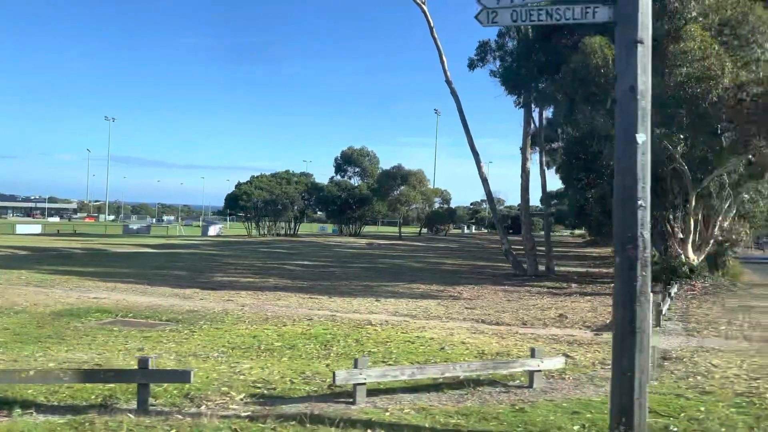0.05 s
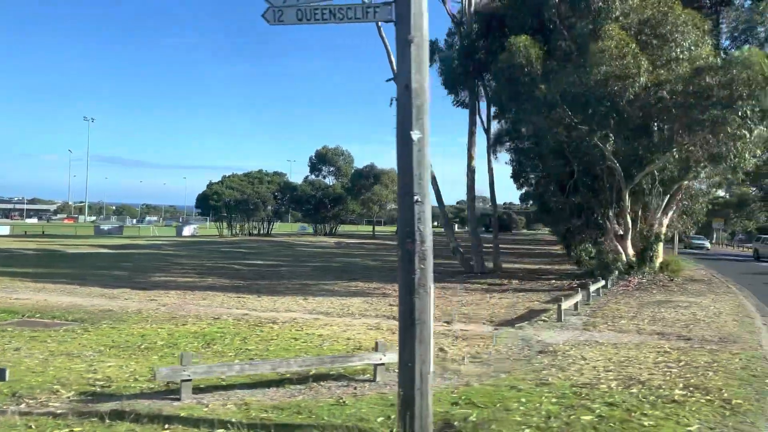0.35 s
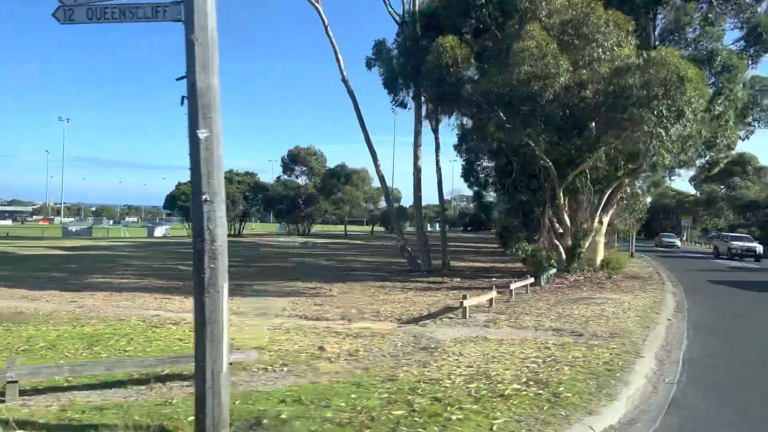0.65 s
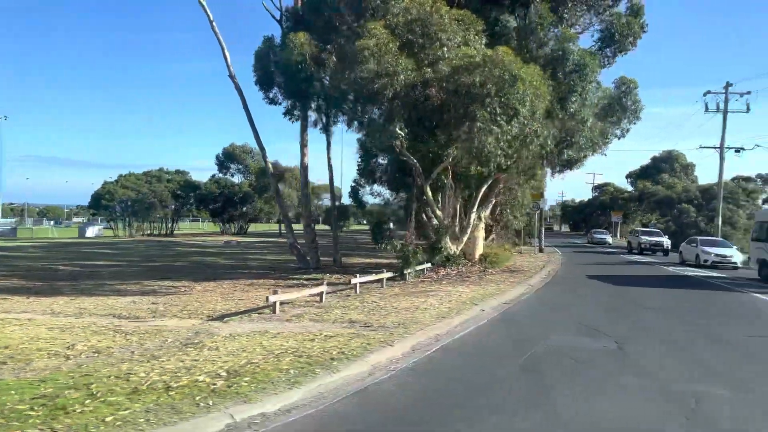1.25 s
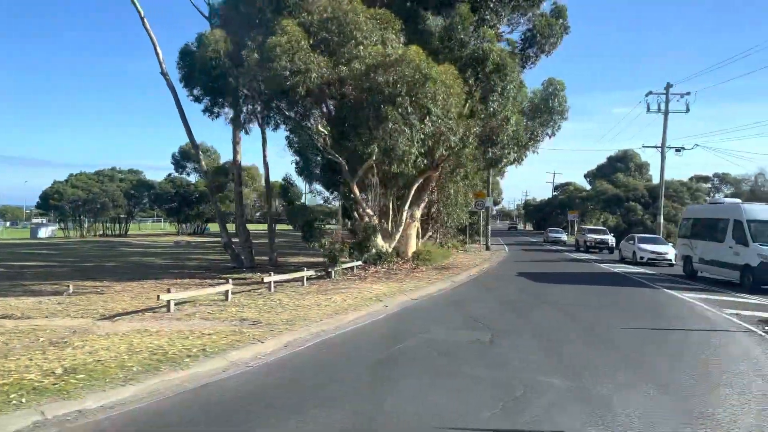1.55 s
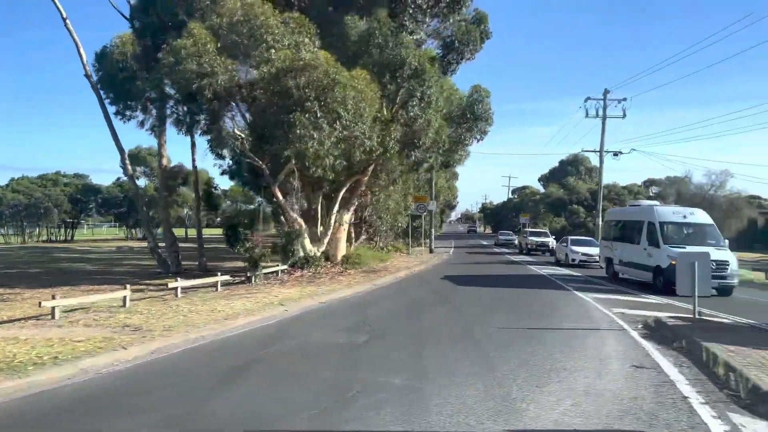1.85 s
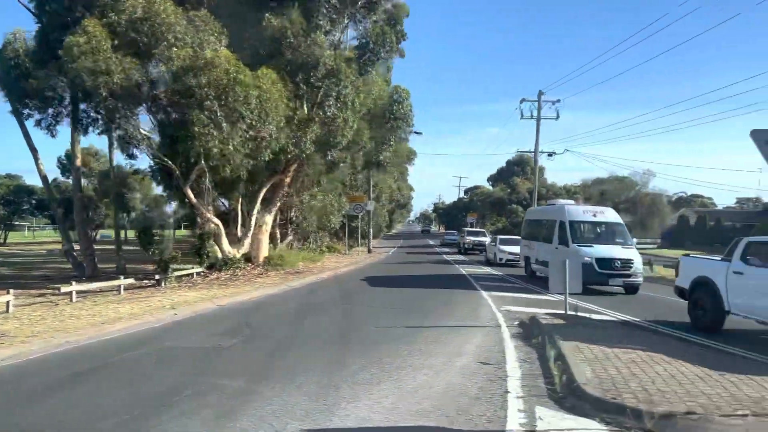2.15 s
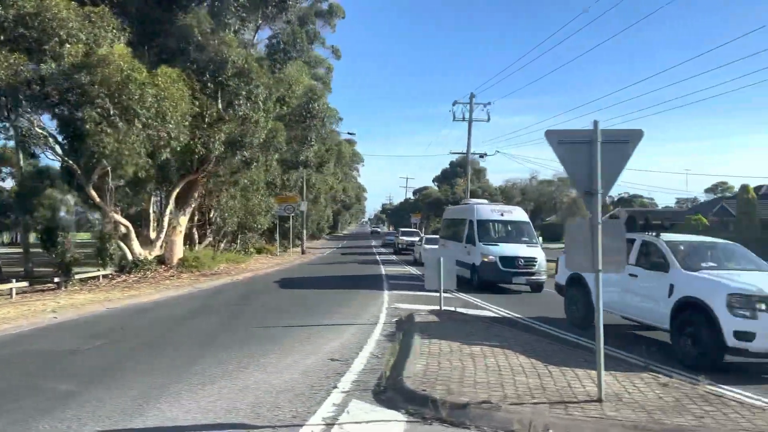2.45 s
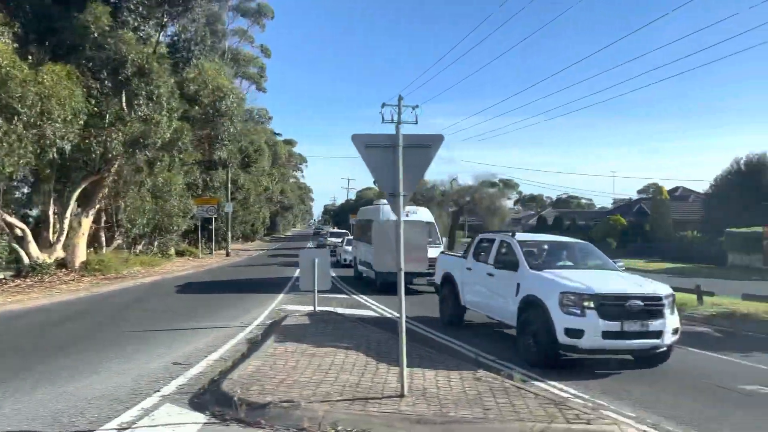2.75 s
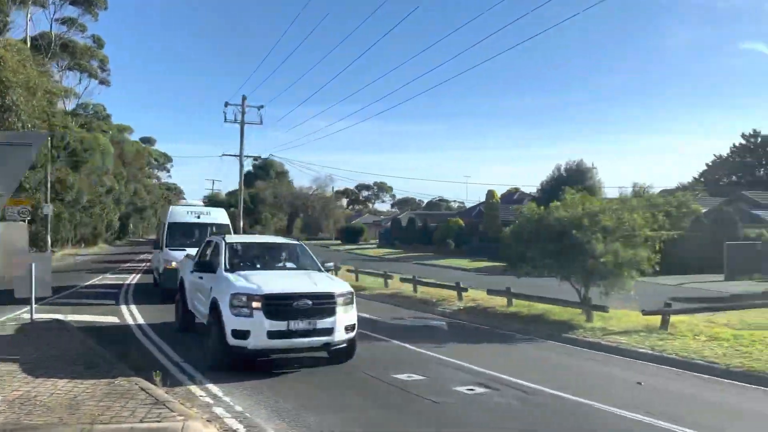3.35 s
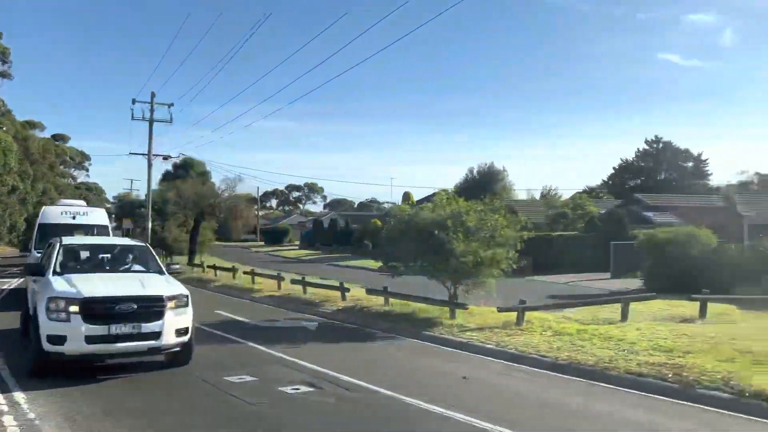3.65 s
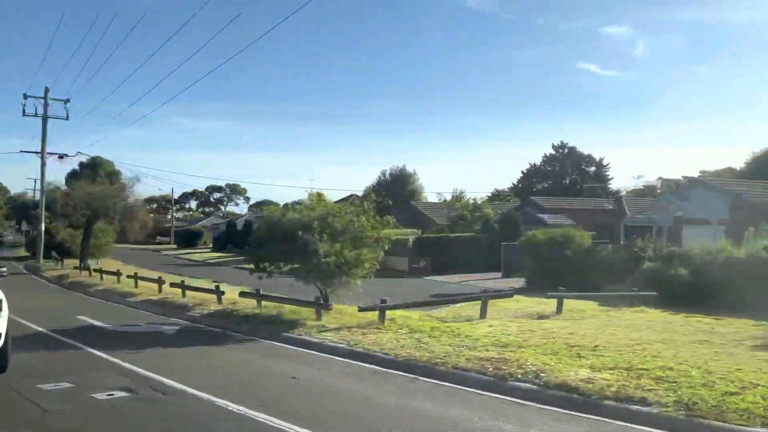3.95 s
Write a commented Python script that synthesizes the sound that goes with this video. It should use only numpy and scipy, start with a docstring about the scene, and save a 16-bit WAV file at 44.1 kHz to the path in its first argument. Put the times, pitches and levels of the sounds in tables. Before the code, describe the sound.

A bus rumbles along, heard from a seat inside, with engine hum, soft air hiss and a faint high whine. Loose panels and fittings rattle as the cabin booms, then the ride settles to soft taps.

```python
"""Inside a bus rolling slowly through a bend. From the start, deep road rumble and tyre roar lie under
the hum of the engine, with hissing air, a faint high whine and buzzing trim. In the first two seconds
the body rocks on the uneven road: the cabin booms twice, loose fittings tick, panels chatter and the
bodywork gives one dull knock. A last jingle and squeal follow. Out of the bend, the hollow ring of the
side panels fades, a seat frame taps softly and a thin whistle swells twice."""
import sys
import numpy as np
from scipy import signal
from scipy.fft import rfft, irfft
from scipy.io import wavfile
from scipy.ndimage import uniform_filter1d

SR = 44100
rng = np.random.default_rng(int(sys.argv[2]) if len(sys.argv) > 2 else 0)


def to_wav(s):
    """Save 16-bit WAV."""
    ch = np.atleast_2d(s).T  # columns
    pcm = np.round(np.clip(ch, -1, 1) * 32767)  # PCM
    wavfile.write(sys.argv[1], SR, pcm.astype(np.int16))


N = 176400
T = np.arange(N) / SR
HZ = np.fft.rfftfreq(N, 1 / SR)

# Road bed faders: time_s, rumble_db, drone_db, roar_db
ROAD_FADERS = [(0.0, -13.5, -14.5, -46), (0.02, -18, -25, -37.5), (0.34, -17, -20.5, -34.5),
               (0.87, -17, -24.5, -36), (1.09, -30, -23.5, -37.5), (1.15, -17.5, -27.5, -38.5),
               (1.61, -16, -22, -35), (1.7, -38, -30, -33), (1.76, -9, -19, -38.5), (1.82, -11, -23, -35),
               (2.04, -21, -25.5, -37.5), (3.38, -17.5, -28.5, -38), (3.45, -26.5, -29.5, -37),
               (4.0, -16.5, -23, -37)]
# Tone of the suspension rumble, body drone and tyre roar: frequency_hz, gain_db
RUMBLE_EQ = [(15, -36), (21, -47), (26, -18), (33, -5.5), (42, 4), (51, 0), (60, 4.5), (72, 4.5), (84, -1),
             (100, -7.5), (140, -22.5), (300, -84)]
DRONE_EQ = [(50, -9), (95, 0), (112, 1.5), (128, -2), (148, 2.5), (170, -2), (205, -5), (245, -6.5),
            (265, -8), (290, -17.5), (340, -22), (600, -67)]
ROAR_EQ = [(150, -2.5), (305, 1), (370, 5), (430, 0.5), (560, -3), (720, -2), (1000, -5), (1200, -10.5),
           (1400, -18), (1550, -14.5), (1800, -24), (2300, -23), (2900, -29.5), (5000, -46)]
# Engine under the floor: time_s, crank_speed_hz, fader_db
ENGINE_RUN = [(0, 28.44, -33), (.3, 29.06, -30.5), (.55, 29.99, -30.5), (.8, 29.84, -28.5),
              (.97, 28.92, -30.5), (1.17, 29.06, -34), (1.38, 29.01, -26.5), (1.55, 29.95, -29.5),
              (1.76, 30.37, -29.5), (1.93, 29.14, -32.5), (2.06, 29.36, -28), (2.18, 28.38, -30),
              (2.38, 29.93, -29), (2.68, 29.44, -30.5), (2.92, 28, -30.5), (3.14, 28.54, -32.5),
              (3.45, 28.3, -30.5), (4, 28.39, -32)]
# Engine and belt-driven tones: crank_multiple, early_db, late_db, pan_left_db, left_lead_rad
ENGINE_ORDERS = [(.885, -28, -6, -1, 0.039), (1.78, -16, 1.5, 2, 0.028), (2.49, -1, 1.5, -0.3, 0.02),
                 (2.87, 1.5, -2.5, 2.5, 0.04), (3.85, -2, -3.5, 6, 0.029), (5.08, -11, -4.5, -2, 0.048),
                 (5.93, -6.5, -1.5, -1.5, 0.17), (8, 0.45, 0, 5.5, 0.12), (8.8, -11, -2.5, -1, 0.25),
                 (12, -20, -10, 14, 0.7)]
# Swells of the cabin boom, hollow side panels and air whistle: time_s, fader_db
BOOM_FADER = [(0, -38), (.22, -32), (.36, -20), (.8, -18.2), (1.03, -28), (1.2, -21), (1.58, -18.2),
              (1.9, -27), (2.2, -38), (4, -42)]
HOLLOW_FADER = [(0, -35.5), (.45, -36.5), (1.0, -42), (1.4, -37.5), (2.1, -48.5), (4, -59)]
WHISTLE_FADER = [(0, -63), (2, -67), (2.45, -58), (2.7, -61.5), (3.05, -63), (3.35, -64), (3.55, -56.5),
                 (3.8, -63), (4, -70)]
# Tone of the side panels, chattering panels, ticks and air hiss: frequency_hz, gain_db
HOLLOW_EQ = [(280, -27), (350, -7.5), (385, -0.5), (425, -17.5), (465, -12), (560, -10), (800, -22),
             (1300, -56)]
PANEL_EQ = [(300, -46), (900, 6), (2100, -6.5), (3000, -2), (5000, -4.5), (6800, -5), (9000, -15),
            (15000, -24)]
TICK_EQ = [(600, -36), (2000, 0.5), (4500, -0.5), (6500, 0.5), (8200, -1), (10000, -11.5), (12500, -5),
           (15500, -17)]
HISS_EQ = [(800, 0.5), (2500, -3), (4200, 2), (5600, -1.5), (7500, -1.5), (8600, -9), (9600, 0),
           (10500, -12), (11800, 3), (13000, -7), (15500, -12)]

# Rattle cues: start_s, level_db, rise_s, fall_s, tilt_db_per_octave
PANEL_CHATTER = [(.198, -41.5, 0.015, 0.031, -5.5), (.407, -30, 0.0069, 0.046, -5.5),
                 (.44, -41.5, 0.072, 0.13, -2.5), (.612, -37.5, 0.0082, 0.042, -6),
                 (.85, -40, 0.0063, 0.031, -5.5), (1.215, -46, 0.0082, 0.087, -1),
                 (1.328, -36, 0.0028, 0.027, -12), (1.37, -40.5, .012, 0.021, 0.5),
                 (1.885, -43.5, 0.014, 0.12, -0.5), (2.326, -42, 0.016, 0.033, 3)]
METAL_JINGLES = [(1.375, -44.5, 0.0086, 0.02, 20), (1.890, -39, 0.0058, 0.047, -2.5),
                 (1.938, -33, 0.0051, 0.019, 2), (1.965, -32.5, 0.007, 0.031, -8),
                 (2.328, -37, 0.016, 0.037, -3)]
CLIP_SQUEALS = [(2.335, -41, 0.0082, 0.018, -1.5)]
COVER_CLACKS = [(.409, -40, .003, .018, 0), (.424, -40, .004, .03, -3)]
JOINT_CREAKS = [(.198, -47, .014, .03, 0)]
# Cues with one envelope shape per part: start_s, fader_db
FITTING_TICKS = [(0.3092, -38.5), (0.3633, -30), (0.411, -34.5), (0.4997, -33.5), (0.5181, -39),
                 (0.615, -38), (0.9793, -31.5), (1.3273, -29.5), (1.693, -34), (2.0627, -36.5),
                 (2.3267, -36)]
SEAL_SQUEAKS = [(1.06, -59), (3.235, -54.5), (3.8, -57)]
SEAT_TAPS = [(2.458, -43), (2.658, -40), (2.938, -39.5), (3.058, -38), (3.696, -40.5), (3.858, -40)]
# Resonances of the loose parts: pitch_hz, width_hz, gain_db
PANEL_RESONANCES = [(1470, 66, 12), (1920, 410, 8.5), (4770, 200, 3.5), (6400, 250, -3)]
METAL_RESONANCES = [(990, 160, 1), (1220, 130, 6), (2115, 130, 1.5), (2585, 90, -.5), (3750, 200, -5),
                    (5560, 300, -8.5)]
CLIP_RESONANCES = [(4840, 110, -5), (5750, 200, -5), (6460, 130, 0)]
COVER_RESONANCES = [(1570, 160, 1), (1820, 210, -4), (2220, 150, -3)]
JOINT_RESONANCES = [(2580, 160, 0), (3250, 260, -8)]
SEAL_RESONANCES = [(3780, 64, 1), (4150, 130, -7)]
SEAT_RESONANCES = [(950, 220, 5), (1220, 130, 2), (2031.7, 500, -18)]
TRIM_RESONANCES = [(747, 43, -49), (962, 164, -48), (1114, 47, -51.5), (1268, 180, -54.5), (1590, 450, -56),
                   (2170, 620, -66)]
# Low modes of the knocked bodywork: pitch_hz, level_db, t60_s
BODY_MODES = [(361, -22, .12), (495, -19.5, .10), (560, -22.5, .05)]
# Narrow bands of air whine: pitch_hz, width_hz, level_db, pan_left_db, growth_db_per_s
WHINE_BANDS = [(3810, 280, -74.5, -4, 1.5), (5245, 130, -63.5, 0, -1), (6170, 110, -74.5, -5, 1),
               (7350, 200, -74.5, 3, 1), (8015, 75, -67.5, 5, -0.6)]

# How alike the left and right microphones sound: frequency_hz, likeness_0_to_1
STEREO_LIKENESS = [(40, .998), (130, .97), (260, .93), (340, .3), (560, .3), (660, .5), (880, .1),
                   (1120, .5), (1250, .3), (1450, .88), (2100, .55), (3000, .2), (7700, .15), (8600, .88),
                   (16000, .88)]
# Phase between the microphones: frequency_hz, left_lead_rad
STEREO_LEAD = [(60, 0), (130, .05), (500, .3), (650, -.8), (1000, -.6), (1130, -3.6), (1750, -4.4),
               (2200, -6.3), (3000, -9), (8800, -6.3), (9300, -6), (9900, -3.2), (10900, -3), (11500, 0),
               (12700, 0), (13500, 3.1), (14400, 3.2), (15200, 6.2)]
# Balance between the microphones: frequency_hz, pan_left_db
STEREO_BALANCE = [(60, -0.5), (150, 1), (240, 2), (320, -2), (430, -3), (700, 1.8), (2000, 2.5), (4000, 0),
                  (6000, -5), (7500, 3.5), (9000, -0.5)]


def road():
    """Rumble through the suspension, drone of the body, and tyre roar fluttering with the surface."""
    rumble = compress(noise(RUMBLE_EQ), window_s=0.064, amount=0.24) * amp(curve(ROAD_FADERS) - 4)
    drone = compress(noise(DRONE_EQ), window_s=0.065, amount=0.99)
    drone *= amp(curve(ROAD_FADERS, column=2) - 0.5)
    roar = noise(ROAR_EQ) * amp(curve(ROAD_FADERS, column=3) + 2.5 + 1.33 * wander(rate_hz=21.5))
    return rumble + drone + roar


def engine():
    """Engine and belt-driven parts hum in wavering tones at multiples of the crankshaft speed."""
    waver_rad, waver_db = 0.29, 0.32
    crank_angle = 2 * np.pi * np.cumsum(curve(ENGINE_RUN)) / SR
    crossfade = np.interp(T, (1.17, 3.2), [0, 1])  # from the early balance of tones to the late one
    hum = np.zeros((2, N))
    for multiple, early_db, late_db, pan_db, lead_rad in ENGINE_ORDERS:
        phase = multiple * crank_angle + waver_rad * wander(rate_hz=7.1) + rng.uniform(0, 2 * np.pi)
        level = amp(early_db + (late_db - early_db) * crossfade + waver_db * wander(rate_hz=4.7))
        hum += pan(pan_db) * level * np.sin(phase - np.array([[0], [lead_rad]]))
    return np.sqrt(2) * hum * amp(curve(ENGINE_RUN, column=2) - 0.5)


def cabin_boom():
    """The lowest air resonance of the cabin swells while the body rocks."""
    pitch_hz, drift_rad = 57.1, 0.29
    phase = 2 * np.pi * pitch_hz * T + drift_rad * wander(rate_hz=1.9)
    return np.sqrt(2) * np.sin(phase) * amp(curve(BOOM_FADER) + 0.5 + 0.61 * wander(rate_hz=21))


def body_knock():
    """One soft blow rings a few low modes of the bodywork."""
    start_s, rise_s = 1.443, 0.004
    age = np.maximum(T - start_s, 0)
    ring = sum(amp(db - 60 * age / t60) * np.sin(2 * np.pi * hz * age) for hz, db, t60 in BODY_MODES)
    return np.minimum(age / rise_s, 1) * ring


def panel_chatter():
    """Loose panels shake with a broad, dry sound."""
    boost_db = sum(db / rolloff(hz, width) for hz, width, db in PANEL_RESONANCES)
    return bursts(PANEL_CHATTER, spectrum(PANEL_EQ) + boost_db)


def fitting_ticks():
    """A loose fitting makes sharp contacts, each with a short spray of cabin reflections."""
    rise_s, fall_s, tail_s, tail_db = 0.001, 0.0022, 0.024, -12
    envelope = np.zeros(N)
    for start, db in FITTING_TICKS:
        age = np.maximum(T - start, 0)
        decay = np.exp(-age / fall_s) + amp(tail_db) * np.exp(-age / tail_s)
        envelope += amp(db - 3.5) * np.minimum(age / rise_s, 1) * decay
    return mic_stereo(envelope * rng.standard_normal((2, N)), spectrum(TICK_EQ))


def small_parts():
    """As the body twists, metal, a slipping clip, a plastic cover, a joint, a seal and a seat ring."""
    squeak_shape, tap_shape = (0.025, 0.057, 0), (0.003, 0.015, 0)  # rise_s, fall_s, no tilt
    squeaks = [(start, db, *squeak_shape) for start, db in SEAL_SQUEAKS]
    taps = [(start, db, *tap_shape) for start, db in SEAT_TAPS]
    return (rattle(METAL_JINGLES, METAL_RESONANCES) + rattle(CLIP_SQUEALS, CLIP_RESONANCES)
            + rattle(COVER_CLACKS, COVER_RESONANCES) + rattle(JOINT_CREAKS, JOINT_RESONANCES)
            + rattle(squeaks, SEAL_RESONANCES) + rattle(taps, SEAT_RESONANCES))


def hollow_panels():
    """Road noise rings the side panels in the low mids, fading out of the bend."""
    return noise(HOLLOW_EQ) * amp(curve(HOLLOW_FADER))


def trim_buzz():
    """Pieces of trim buzz in brief, uneven spurts, partly shaken together; their travel is limited."""
    shared_db = 6 * wander(rate_hz=20)
    buzz = np.zeros((2, N))
    for hz, width, db in TRIM_RESONANCES:
        spurt_db = np.minimum(shared_db + 9.5 * wander(rate_hz=20), 7)
        buzz += unit(noise_band(hz, width) * amp(spurt_db)) * amp(db)
    return buzz


def air():
    """Air hisses softly, with a fuzzy whine and one thin whistle that swells out of the bend."""
    hiss = noise(HISS_EQ) * amp(-55 + 0.5 * wander(rate_hz=11))
    whine = sum(noise_band(hz, width) * pan(pan_db) * amp(db + growth * T)
                for hz, width, db, pan_db, growth in WHINE_BANDS)
    whistle = compress(noise_band(hz=5130, width_hz=110), window_s=0.031, amount=0.65)
    return hiss + whine + whistle * pan(-1.5) * amp(curve(WHISTLE_FADER))


def rattle(cues, resonances):
    """Bursts of contacts ring a small part in a few narrow resonances."""
    gain = sum(amp(db) / rolloff(hz, width) for hz, width, db in resonances)
    return bursts(cues, 20 * np.log10(gain + 1e-6))


def bursts(cues, eq_db):
    """Tiny contacts in a wash of noise swell and die away, coloured by the part they shake."""
    contacts_per_s, wash_gain = 500, 3.3
    octaves = np.log2(np.maximum(HZ, 1000) / 1000)  # the tilt acts above 1 kHz
    out = np.zeros((2, N))
    for start, db, rise, fall, tilt in cues:
        contacts = unit((rng.random(N) < contacts_per_s / SR) * rng.standard_normal((2, N)))
        drive = unit(contacts + wash_gain * rng.standard_normal((2, N)))
        envelope = np.clip((T - start) / rise, 0, 1) * np.exp(-np.maximum(T - start - rise, 0) / fall)
        out += amp(db) * mic_stereo(drive * envelope, eq_db + tilt * octaves)
    return out


def mic_stereo(drive, eq_db):
    """Colours two unrelated signals and blends them into the microphone pair's stereo image."""
    left, other = rfft(drive)
    likeness = np.clip(spectrum(STEREO_LIKENESS), 0, 1)
    right = (likeness * left + np.sqrt(1 - likeness ** 2) * other) * np.exp(-1j * spectrum(STEREO_LEAD))
    side = amp(spectrum(STEREO_BALANCE) / 2)
    return irfft(np.array([left * side, right / side]) * unit(amp(eq_db)), N)


def noise(eq):
    """Steady stereo noise shaped by an EQ table."""
    return unit(mic_stereo(rng.standard_normal((2, N)), spectrum(eq)))


def noise_band(hz, width_hz):
    """Stereo noise in one resonance."""
    return unit(irfft(rfft(rng.standard_normal((2, N))) / rolloff(hz, width_hz), N))


def rolloff(hz, width_hz):
    """Divisor that carves a bell: 1 at the centre, 2 half a width away."""
    return 1 + (2 * (HZ - hz) / width_hz) ** 2


def compress(x, window_s, amount):
    """Evens out the chance swells of a narrow noise."""
    power = uniform_filter1d((x ** 2).mean(0), max(int(window_s * SR), 2))
    return unit(x / (abs(power) + 1e-6) ** (np.clip(amount, 0, 1) / 2))


def wander(rate_hz):
    """Random modulation of rms 1, rolling off above the given rate."""
    return unit(irfft(rfft(rng.standard_normal(N)) * (HZ > 0) / (1 + (HZ / rate_hz) ** 4), N))


def spectrum(points):
    """Draws a table across a log frequency axis."""
    hz, value = np.transpose(points)
    return np.interp(np.log(HZ + 1), np.log(hz), value)


def curve(rows, column=1):
    """Draws one column of a table over time."""
    rows = np.array(rows)
    return np.interp(T, rows[:, 0], rows[:, column])


def pan(db):
    """Left and right gains; positive leans left."""
    return amp(np.array([[db], [-db]]) / 2)


def amp(db):
    """Decibels to gain."""
    return 10 ** (np.asarray(db) / 20)


def unit(x):
    """Scales to rms 1."""
    return x / np.sqrt(np.mean(x ** 2) + 1e-20)


def scene():
    """The full mix, heard from a seat in the cabin."""
    bed = engine() + cabin_boom() + road() + hollow_panels() + air()
    return bed + fitting_ticks() + panel_chatter() + small_parts() + body_knock() + trim_buzz()


def record(dry):
    """A steep high cut takes off the very top."""
    high_cut = signal.firwin(511, 15900, window=("kaiser", 9), fs=SR)
    return signal.oaconvolve(dry, high_cut[None], "same")


dry = scene()
out = record(dry)
to_wav(out)
```